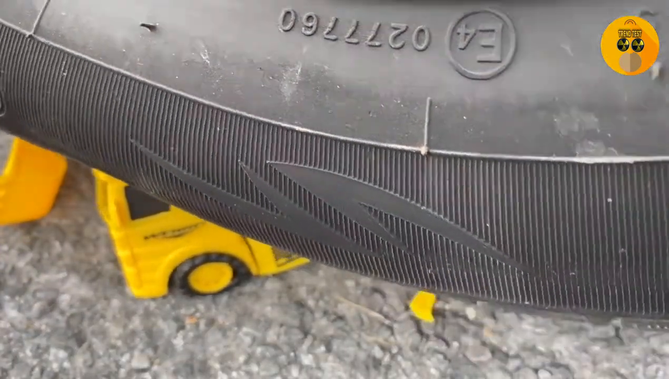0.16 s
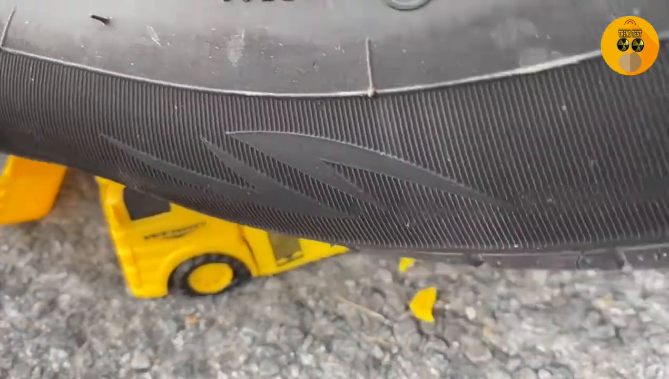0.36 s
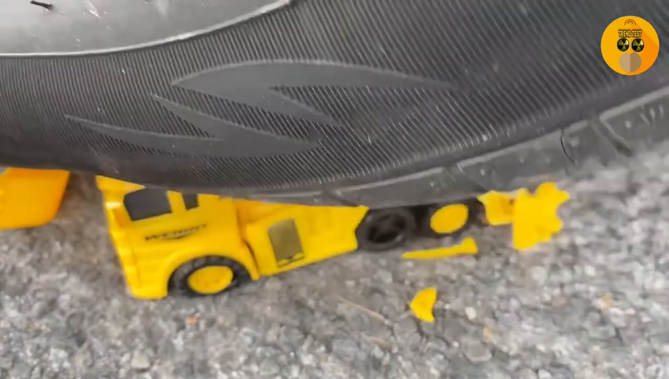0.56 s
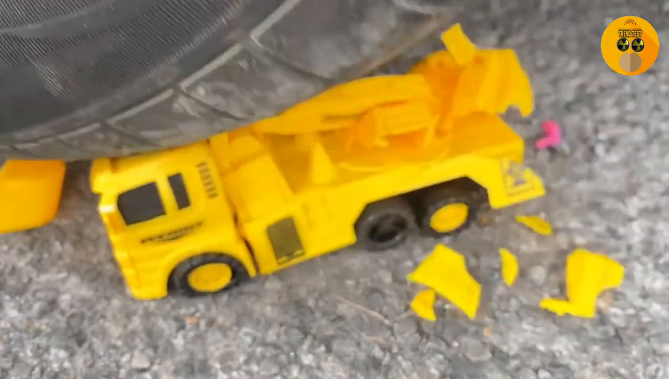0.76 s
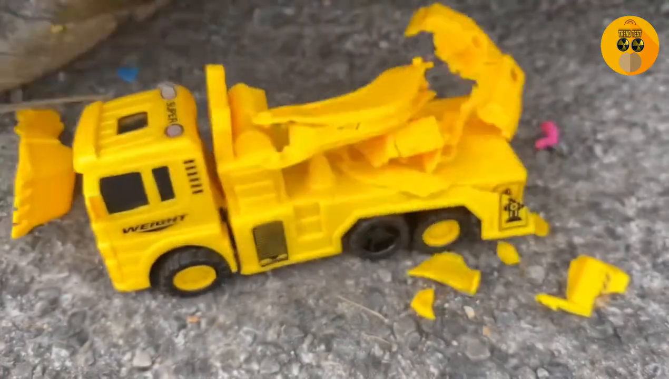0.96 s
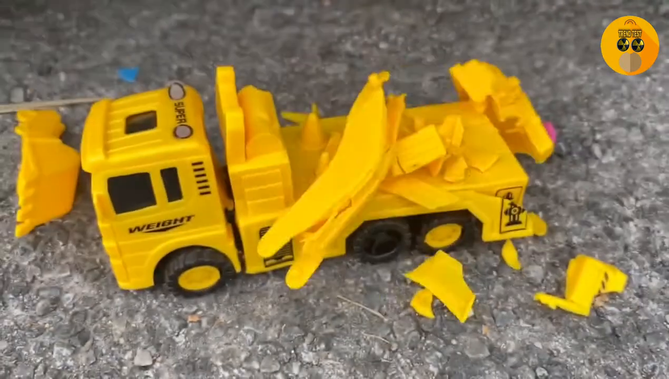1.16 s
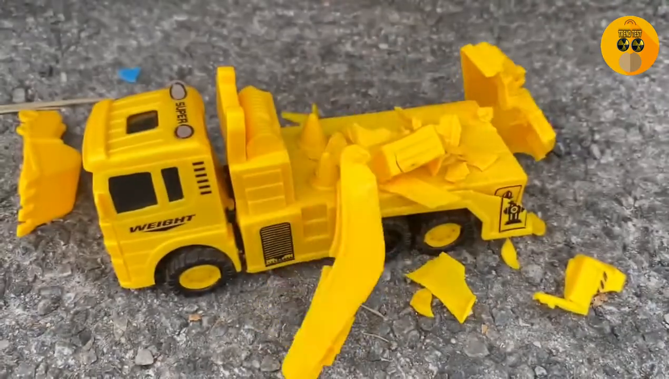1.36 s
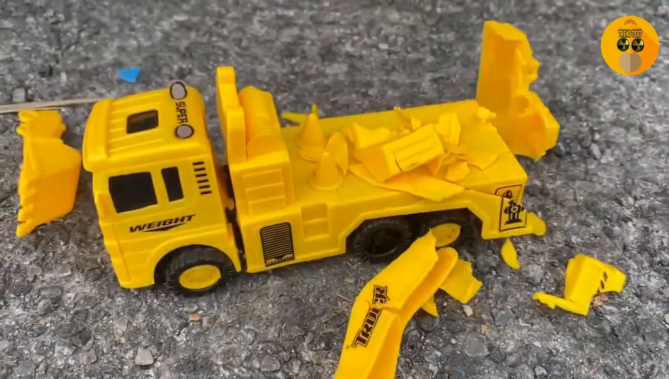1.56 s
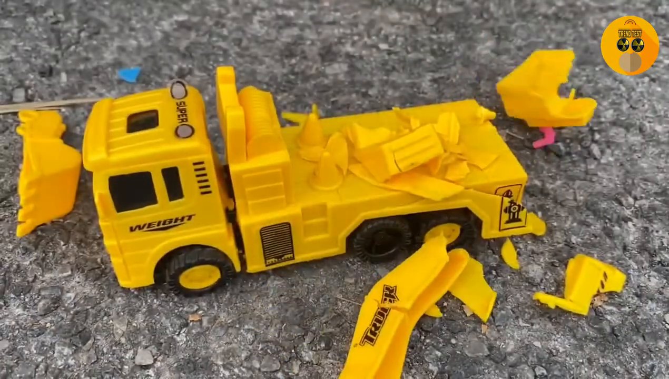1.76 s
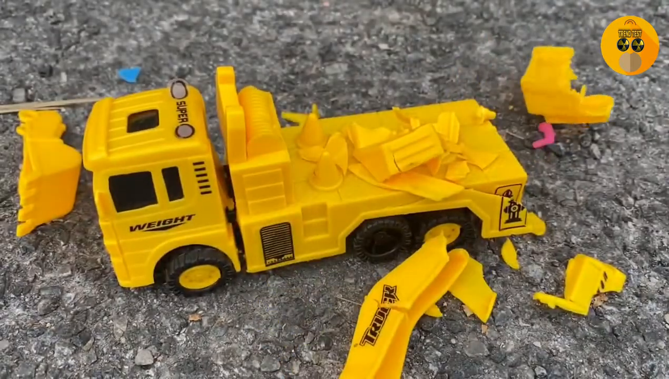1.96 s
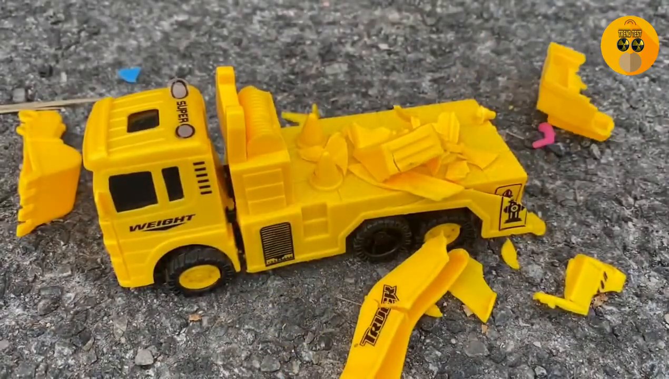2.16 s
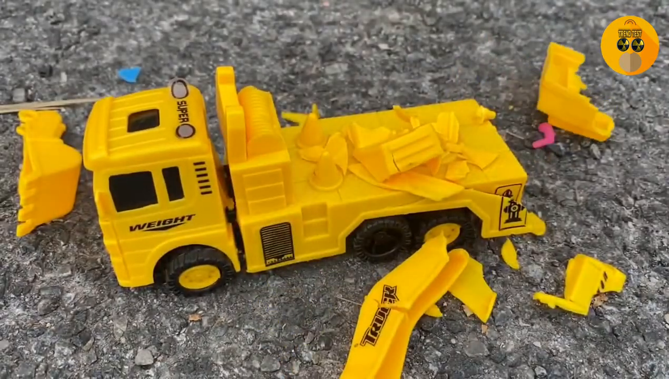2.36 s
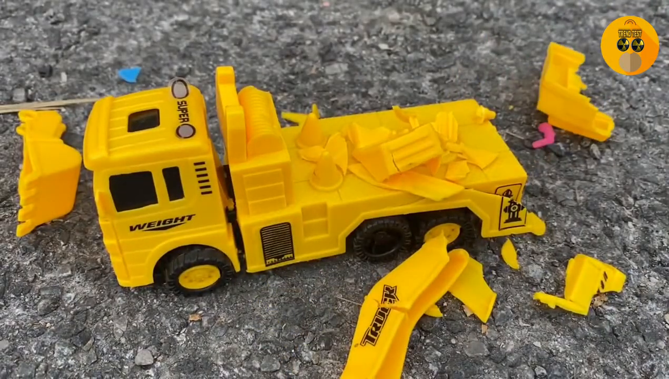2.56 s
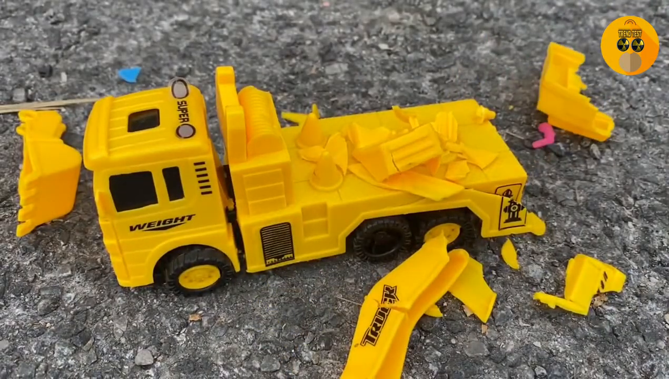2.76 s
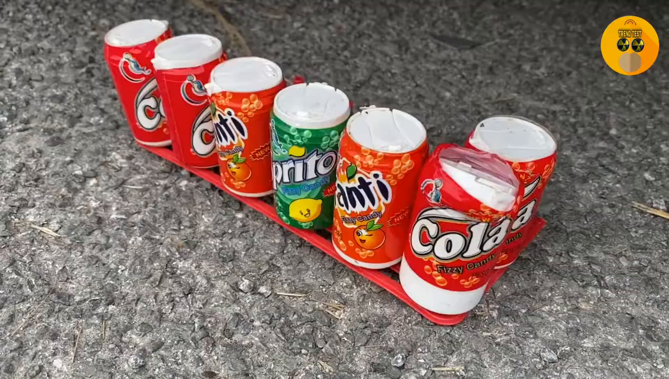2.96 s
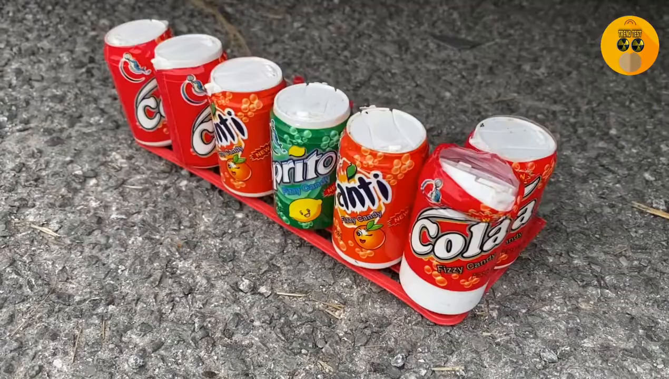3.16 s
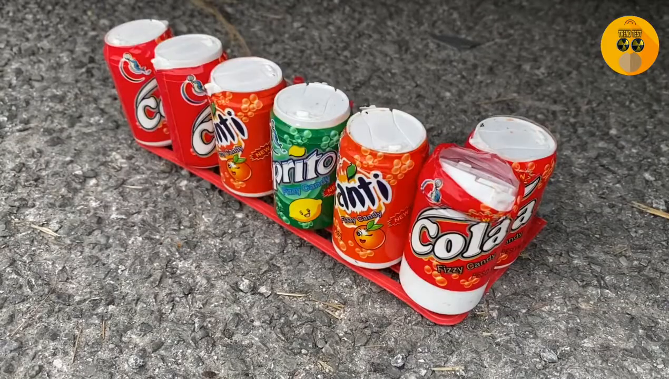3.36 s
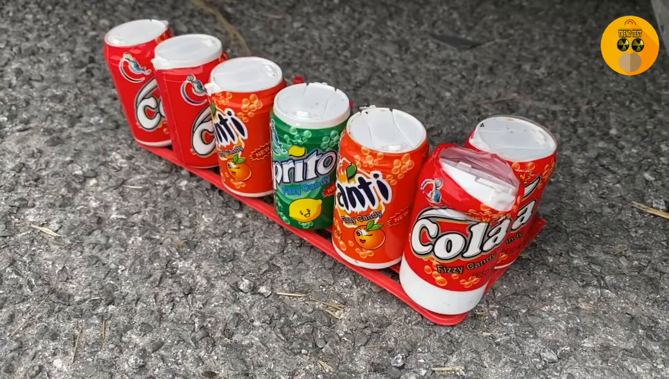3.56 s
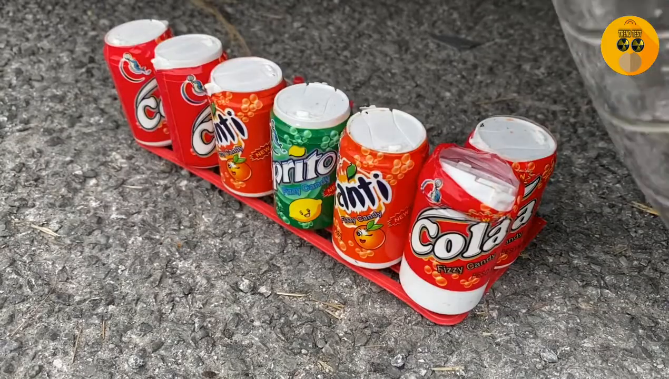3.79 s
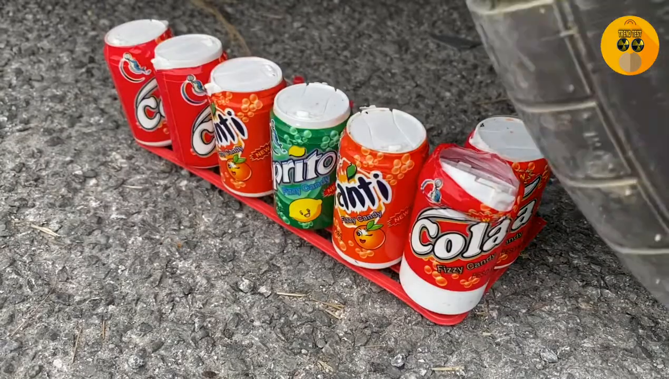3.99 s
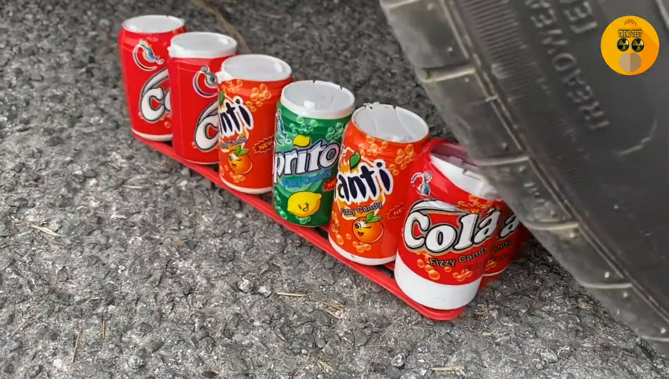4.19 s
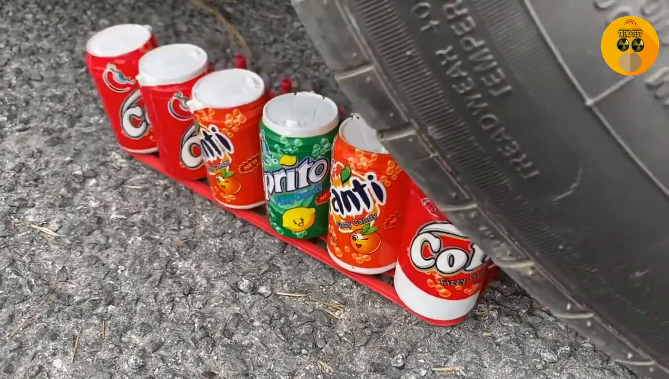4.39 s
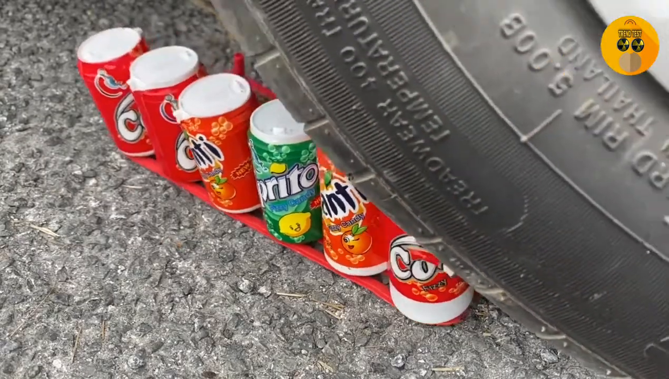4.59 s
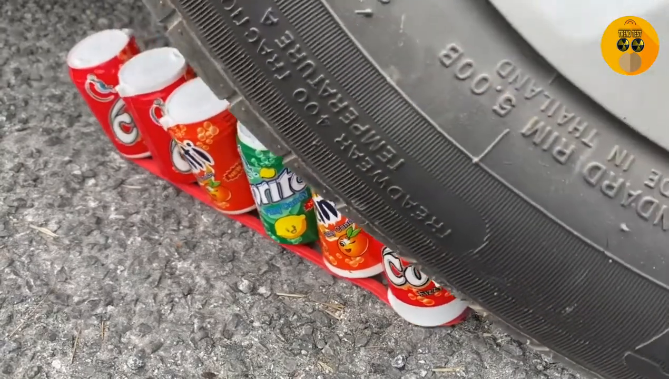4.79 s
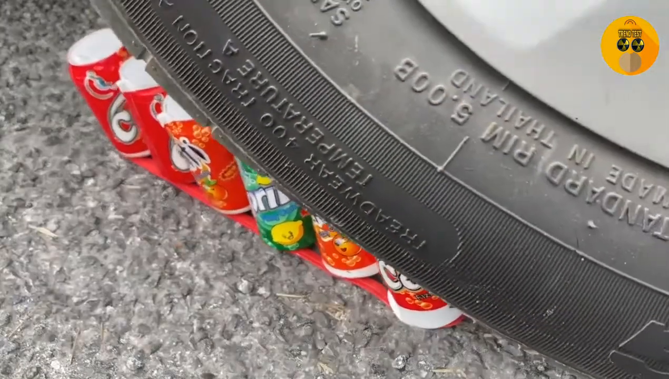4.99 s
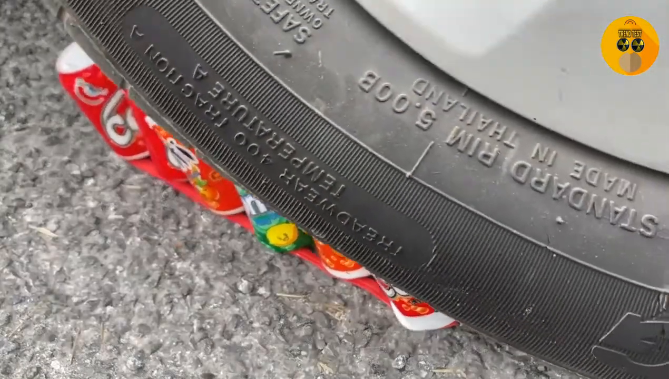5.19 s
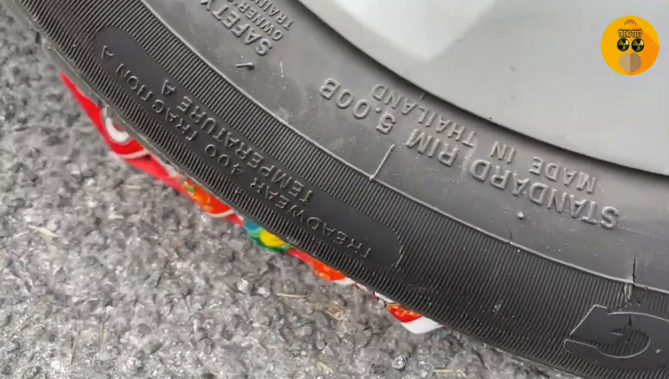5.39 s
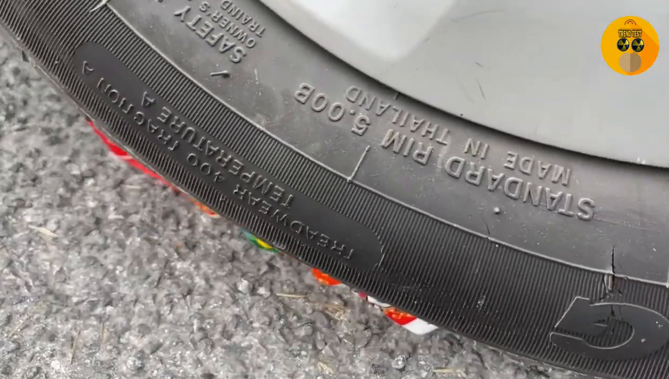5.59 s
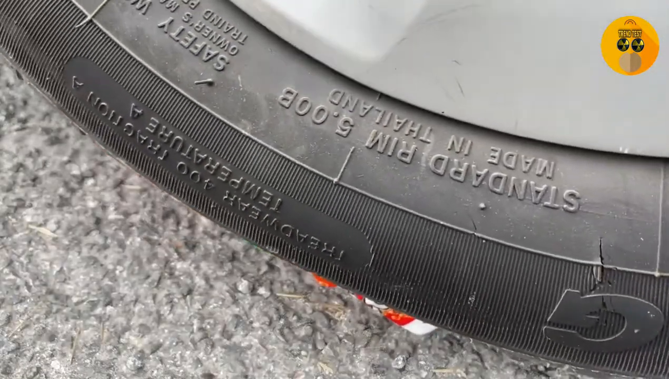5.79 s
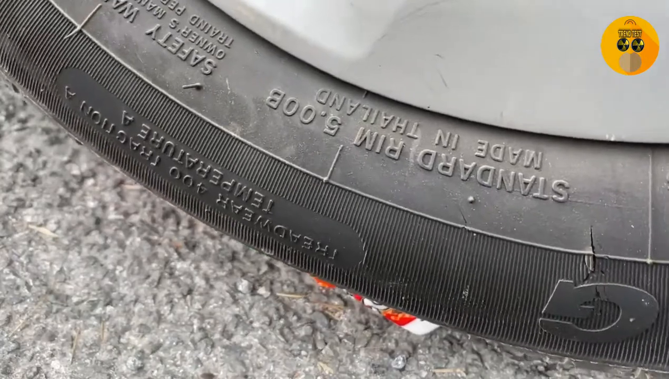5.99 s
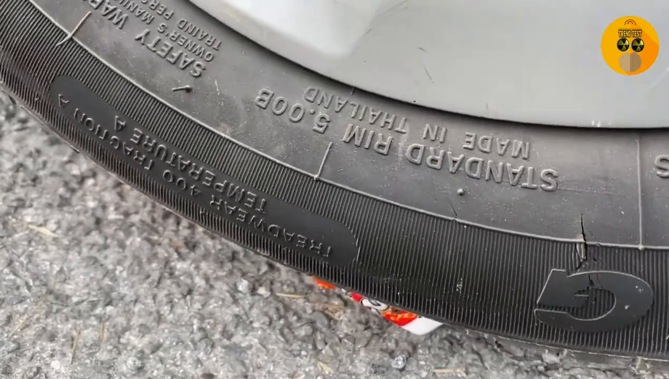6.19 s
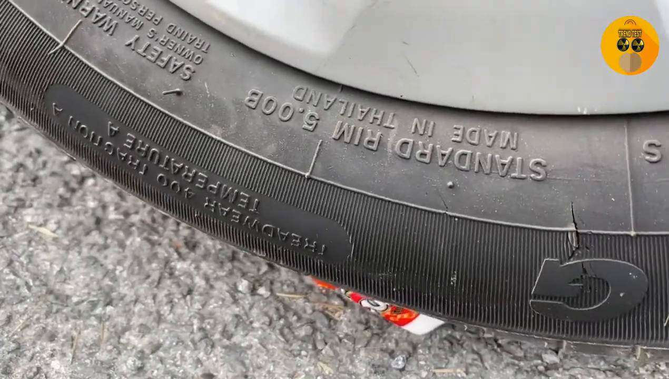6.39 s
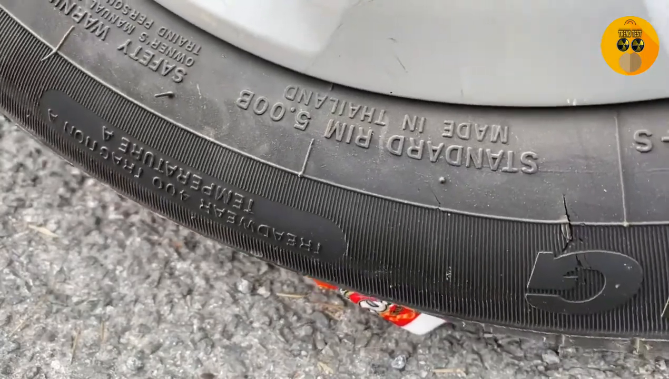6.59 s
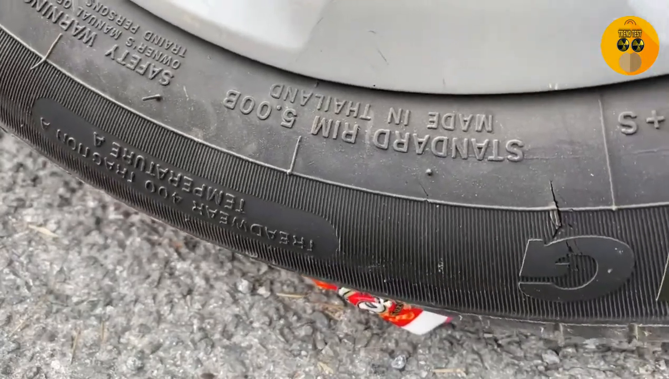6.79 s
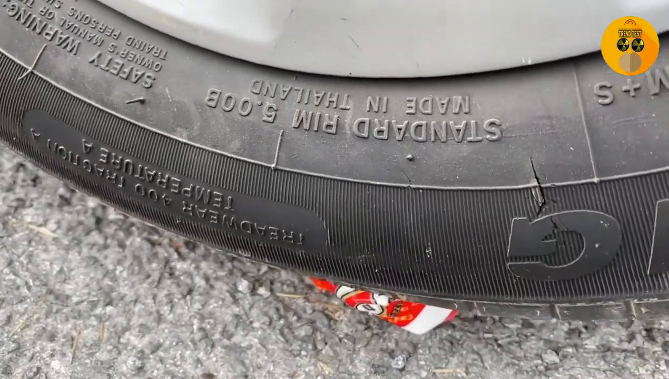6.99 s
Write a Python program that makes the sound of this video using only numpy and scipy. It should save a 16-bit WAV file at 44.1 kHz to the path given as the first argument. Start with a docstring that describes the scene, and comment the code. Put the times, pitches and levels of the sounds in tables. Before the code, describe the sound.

A car tyre creeps over hollow plastic toys on asphalt, snapping a truck, then crunching small cans with sharp cracks and deep thumps beside an idling engine.

```python
"""On asphalt, close to the microphone, a car creeps over hollow plastic toys, in two scenes.
First a toy truck snaps and its pieces skitter away; after an abrupt change of scene the engine throbs nearer
and the tyre crunches through a row of small cans, which split one by one and thump against the rubber.
Plastic is shaped noise and short panel rings, thumps are sinking sines, the engine is harmonics
and fluttering noise; random echo patterns add the wheel arch."""
import sys
import numpy as np
from scipy import signal
from scipy.fft import rfft, irfft, next_fast_len
from scipy.io import wavfile

SR = 44100
rng = np.random.default_rng(int(sys.argv[2]) if len(sys.argv) > 2 else 0)


def digitize_waveform(pressure):
    """Quantize a signal to 16-bit integers and store it at the path in sys.argv[1].

    Rows of a 2-D input are taken as channels; values are limited to [-1, 1].
    """
    field = np.atleast_2d(pressure).T
    bounded = np.clip(field, -1, 1)
    quanta = np.round(bounded * 32767).astype(np.int16)
    wavfile.write(sys.argv[1], SR, quanta)


N = 310905
TIME = np.arange(N) / SR
CANS_START_S = 2.99  # the truck scene gives way to the can scene

# Fractures: (time [s], length [s], strength [dB], body [dB], edge [dB], shell note [Hz], left-right bias [dB])
# body: how much of the big panels moves with it; edge: how keenly the crack tip snaps
FRACTURES = [(0.1139, .0035, -19.5, -1.5, 3, 3565, -5), (0.1828, 0.0012, -36, -3, 3, 4530, 3),
             (.1900, 0.0035, -23.5, 0.5, 2.5, 4920, -12), (0.2122, 0.0055, -38.5, 4, 8, 1250, 9),
             (0.2953, 0.0032, -24.5, 11.5, -3.5, 1090, 16), (0.3339, 0.0043, -30.5, 9.5, 0.5, 740, 9),
             (0.5438, 0.0035, -45, 10.5, -14, 650, 4), (0.5676, 0.0015, -38, -6.5, -12, 560, 6),
             (.615, 0.0028, -34, -17, 12.5, 4600, -1), (0.628, 0.0016, -25, -19, 1.5, 4300, -7),
             (0.6855, 0.0013, -26.5, 0, -6.5, 1960, 9), (4.2127, 0.0043, -47.5, 7, 17, 3240, 2),
             (4.2273, 0.0031, -48, 20, 18, 1580, -7), (4.313, 0.0077, -45.5, 22.5, -12, 2020, 10),
             (4.361, 0.0055, -32, -1, 12, 2910, 19), (4.3714, .0017, -23.5, -16, 10, 5600, 5),
             (4.403, 0.012, -36, 13.5, 21.5, 5150, 10), (4.4203, 0.00017, -32.5, 1, 18.5, 4730, -13),
             (4.4543, 0.0036, -22, 5.5, -6.5, 868, -3), (4.4595, 0.0055, -33, -7, 18.5, 5230, 18),
             (4.4893, 0.011, -25, -7, 2, 1200, 3), (4.4999, 0.007, -17, -2.5, -5, 546, 6),
             (4.5055, 0.0057, -30, -15, -2, 2650, 8), (4.5235, 0.0033, -28.5, -9, 11, 2720, 7),
             (4.53, 0.0075, -31, -11, -11, 2800, 9), (4.555, 0.0017, -23.5, -8, -2, 1170, -4),
             (4.618, 0.0044, -28, 2, 3, 1440, -1), (4.6455, 0.00047, -18, -9, -0.5, 690, -9),
             (4.7324, 0.0022, -19.5, -3, 3, 605, 9), (4.761, .0023, -32, -13, -1, 1330, 12),
             (4.8525, 0.00067, -27, -0.5, 4.5, 507, 6), (5.1328, .0035, -17.5, -1, 0, 5420, 8),
             (5.1954, 0.007, -29, 10, 2.5, 1270, -4), (5.2193, 0.00033, -16, -19, 2, 5220, 15),
             (5.2252, 0.0047, -20.5, 5.5, -17, 3100, 8), (5.516, 0.0022, -26, 5, -1, 897, 1),
             (5.5885, 0.002, -32.5, -0.5, 2, 1230, 4), (5.6035, 0.001, -29.5, -5.5, -11, 700, 5),
             (5.626, 0.0022, -29, 0.5, -8, 1270, 5), (5.7279, 0.003, -22.5, 0, 3, 1280, 6),
             (5.789, 0.0029, -12, -5.5, -4.5, 730, 23), (6.1085, 0.00063, -30, -1.5, 9, 1260, 11),
             (6.1383, 0.004, -18, -7.5, -2, 3680, -6), (6.2919, 0.0018, -25, -15, 6, 660, -11),
             (6.419, 0.0032, -21, 3, 1, 1170, 5.5), (6.8064, 0.0028, -30, -2.5, -1.5, 1690, 8)]
# Bands of each crack: the microphone delays the bass; each band has its own length:
# (lower edge [Hz], upper edge [Hz], delay [s], factor on length [1], share of body [1], share of edge [1])
FRACTURE_BANDS = [(201, 387, .0016, 0.9, 1, 0.027), (492, 1130, 0.00065, 1.83, 0.65, 0.05),
                  (1056, 2480, 0.00017, 1.7, 0.17, 0), (2750, 4780, 0.00007, 1.16, 0.04, 0.3),
                  (5450, 9600, 0.000036, 1.28, 0.031, 0.92)]
# Colour of the shards: (frequency [Hz], level [dB])
SHARD_COLOUR = [(100, 1.5), (3200, -1.5), (4100, -2), (5000, -1), (6300, -6), (7600, 3.5), (9000, 0.5),
                (10000, -4)]


def gain_of(db):
    """Level law: decibels to an amplitude ratio."""
    return 10 ** (np.asarray(db) / 20)


def evened(x):
    """Equal power: each channel is scaled to rms 1."""
    return x / np.sqrt(np.mean(x ** 2, -1, keepdims=True) + 1e-20)


def read(points, hz):
    """Spectral interpolation: straight lines on a log-frequency axis."""
    f, value = np.transpose(points)
    return np.interp(np.log(hz + 1), np.log(f + 1), value)


def curves(rows):
    """Linear interpolation in time: the columns of a control table at every sample."""
    s, *columns = np.transpose(rows)
    return [np.interp(TIME, s, column) for column in columns]


def coloured(x, points):
    """Linear filtering: the spectrum is multiplied by a (frequency [Hz], level [dB]) curve."""
    size = next_fast_len(N + 4096)
    gain = gain_of(read(points, np.fft.rfftfreq(size, 1 / SR)))
    return irfft(rfft(x, size) * gain, size)[..., :N]


def band(x, lo_hz, hi_hz, order=3):
    """Causal band-pass: frequencies outside the two edges are attenuated."""
    edges_hz = [lo_hz, min(hi_hz, SR / 2 - 100)]
    return signal.sosfilt(signal.butter(order, edges_hz, "band", fs=SR, output="sos"), x)


def add(mix, s, sound):
    """Superposition: a sound is mixed in at time s."""
    part = mix[..., max(round(s * SR), 0):][..., :sound.shape[-1]]
    part += sound[..., :part.shape[-1]]


def wander(per_s):
    """Random modulation: a curve of about unit size that takes per_s new values a second."""
    knots = np.arange(4096) / per_s
    return np.interp(TIME, knots, rng.standard_normal(len(knots)))


def engine(rush_db=3.5, throb_db=0.73, waver=0.35, flutter_db=1.04, surge_db=2.0, whine_drift=1.0,
           tappet_db=-14, tappet_phase=0.55, tappet_width=0.028):
    """Periodic excitation: low orders align once a cycle into a throb; fan rush flutters and a tappet ticks."""
    # Engine beside the truck, then beside the cans: (time [s], hum [dB], rush of fan and belts [dB])
    far = [(0, -54, -50.5), (.6, -53, -52), (.8, -67, -49), (2.95, -58.5, -56.5)]
    near = [(3.0, -40.5, -38), (4.5, -37.5, -40), (4.95, -54, -52.5), (5.95, -49, -53), (6.35, -52.5, -47),
            (7.05, -50.5, -50.5)]
    # Harmonics of the engine cycle: (multiple of the cycle [1], level [dB])
    harmonics = [(3, -7), (4, -16), (5, -20.5), (6, 0.5), (7, -12), (8, -7.5), (9, -12.5), (13, -16),
                 (14, -10.5)]
    # Spectrum of the rush: (frequency [Hz], level [dB per Hz])
    rush_colour = [(15, -3), (45, 16), (130, 6.5), (260, 5.5), (400, 1), (700, 0), (1200, -0.5),
                   (2000, -11.5), (3000, -13), (4500, -13.5), (6400, -22.5), (7600, -13.5), (9000, -14),
                   (10000, -25.5)]
    # Fan and belt tones against the rush curve: (frequency [Hz], level by the truck [dB], by the cans [dB])
    tones = [(140, -8, -15), (402, -10, -30), (484, -18, -29.5), (577, -18, -16.5), (617, -10.5, -8)]
    cycle_hz, strong_firing_s = 10.78, 3.067

    cut = [(CANS_START_S, *far[-1][1:]), (CANS_START_S + 1 / SR, *near[0][1:])]
    hum_db, rush_curve_db = curves(list(far) + cut + list(near[1:]))
    cycle = (TIME - strong_firing_s) * cycle_hz

    hum = np.zeros(N)
    for multiple, db in harmonics:
        size = gain_of(db) * (1 + waver * wander(3.4)) * np.sqrt(2)
        hum -= size * np.cos(2 * np.pi * multiple * cycle + waver * wander(15))

    air = evened(coloured(rng.standard_normal((2, N)), rush_colour))
    body_filter = signal.butter(2, [180, 1500], "band", fs=SR, output="sos")
    body = signal.sosfiltfilt(body_filter, air)
    air = air - body + body * gain_of(surge_db * wander(35))  # the body is lumpier than the hiss
    air = air * gain_of(throb_db * np.cos(2 * np.pi * cycle) + flutter_db * wander(130))

    whine = np.zeros(N)
    for hz, far_db, near_db in tones:
        size = gain_of(np.where(TIME < CANS_START_S, far_db, near_db)) * np.sqrt(2)
        whine += size * np.sin(2 * np.pi * hz * TIME + whine_drift * wander(14))

    tick_noise = evened(band(rng.standard_normal((2, N)), 3000, 9500, order=1))
    tappet = tick_noise * np.exp(-((cycle - tappet_phase) % 1) / tappet_width)
    tonal = gain_of(hum_db) * hum + gain_of(rush_curve_db) * whine
    return tonal, gain_of(rush_curve_db + rush_db) * (air + gain_of(tappet_db) * tappet)


def grains(per_s, size_db, decay, count=12):
    """Shot noise: random micro-fractures of uneven size, each ringing one of a few scraps of plastic."""
    t, out = np.arange(400) / SR, np.zeros((2, N))
    scraps = evened(rng.standard_normal((count, 2, len(t))) * np.exp(-t / decay))
    chance, which = rng.random(N), rng.integers(0, count, N)
    size = np.minimum(rng.exponential(1, N), 3)
    for i in np.flatnonzero(chance < per_s / SR):
        add(out, i / SR, gain_of(size_db * size[i]) * scraps[which[i]])
    return out


def hollow(x):
    """Resonance: the modes of the hollow shells are added to the sound."""
    # Shell resonances: (frequency [Hz], width [Hz], lift [dB])
    resonances = [(474, 10, -16.5), (850, 62, 5.5), (1270, 97, 8), (1870, 300, 4), (2600, 140, 1),
                  (3070, 84, 3.5), (5100, 63, -6), (7200, 46, 3.5), (7570, 110, 2.5)]
    return x + sum(gain_of(db) * signal.lfilter(*signal.iirpeak(hz, hz / width, fs=SR), x)
                   for hz, width, db in resonances)


def folding(swell_db_per_s=336, fade_db_per_s=430):
    """Buckling: each wall swells into its fold and dies away; the loudest at any moment sets the level."""
    # Folds of the can walls: (time of the height [s], level [dB])
    buckles = [(4.24, -36), (4.34, -30), (4.471, -16.5), (4.529, -17), (4.648, -22.5), (4.758, -22.5)]
    return np.max([db - np.maximum(swell_db_per_s * (s - TIME), fade_db_per_s * (TIME - s))
                   for s, db in buckles], axis=0)


def crunch(crackle_db=1, calm_per_s=260, crowding=0.07):
    """Crackling noise: strain sets level and rate of fine fractures; sliding and folding add a coarser crunch."""
    # Strain on the truck, then on the cans: (time [s], crackle level [dB])
    truck_strain = [(0, -92), (.15, -48.5), (.75, -70), (1.05, -61.5), (1.3, -65), (1.6, -61), (2.1, -68)]
    can_strain = [(4.15, -53), (4.29, -48.5), (4.51, -31.5), (4.62, -30.5), (4.92, -47), (5.47, -52.5),
                  (5.66, -40.5), (5.82, -59), (6.25, -52.5), (6.65, -54)]
    # Truck pieces slide and settle on the road: (time [s], level [dB])
    slides = [(.5, -74), (.72, -59), (1.25, -49.5), (1.55, -59.5), (2.3, -58), (2.6, -59.5)]
    # Spectra of the fine crackle and of the walls: (frequency [Hz], level [dB per Hz])
    fine_colour = [(200, -29), (1000, 0.5), (2300, -1), (3300, -0.5), (4200, -4.5), (5200, -2), (6400, -6),
                   (7600, 1), (9300, -1), (10500, -12.5)]
    wall_colour = [(60, -6.5), (180, -6), (300, 5), (500, 0.5), (900, -11), (1500, -13.5), (2700, -11),
                   (4000, -9), (9000, -13)]

    strain_db, = curves(list(truck_strain) + [(4.1, -78)] + list(can_strain))
    load_db = np.where(TIME < CANS_START_S, curves(slides)[0], folding())
    # more strain, more fractures at once
    per_s = calm_per_s + crowding * SR * gain_of(strain_db - strain_db.max())
    fine = grains(per_s, size_db=13.0, decay=0.0013) / np.sqrt(per_s)
    fine = evened(hollow(coloured(fine, fine_colour)))
    coarse = grains(per_s=1300, size_db=6.0, decay=0.0021)
    coarse = evened(hollow(coloured(coarse, wall_colour)))
    return gain_of(strain_db + crackle_db) * fine + gain_of(load_db) * coarse


def crack_levels():
    """Spectral balance: fracture strength in each band, with body lifting the bass and edge the treble."""
    _, _, strength, body, edge, _, _ = np.transpose(FRACTURES)
    return np.array([strength + body_share * body + edge_share * edge
                     for *_, body_share, edge_share in FRACTURE_BANDS])


def cracks(rise=0.000065, truck_ring_db=-26, can_ring_db=-16, ring_time=0.0059, pan_share=0.25, uneven_db=5):
    """Brittle fracture: tiny ruptures run through the shell in milliseconds; the shards ring very briefly."""
    s, length, *_, pan_db = np.transpose(FRACTURES)
    t = np.arange(2048) / SR
    ruptures = rng.standard_normal((len(s), 2, len(t)))
    # a few ruptures are much larger than the rest
    ruptures = ruptures * gain_of(uneven_db * rng.standard_normal((len(s), 1, len(t))))
    sounds = np.zeros_like(ruptures)
    # thin cans ring on, the thick truck snaps dry
    ring_db = np.where(s < CANS_START_S, truck_ring_db, can_ring_db)[:, None, None]
    for (lo_hz, hi_hz, delay, stretch, *_), db in zip(FRACTURE_BANDS, crack_levels()):
        age = np.maximum(t - delay, 0)
        running = np.exp(-(age / (stretch * length[:, None, None])) ** 2)
        ringing = gain_of(ring_db) * np.exp(-age / ring_time)
        shape = (1 - np.exp(-age / rise)) * (running + ringing)
        # only bands below 3 kHz lean to a side
        sides = evened(gain_of(np.outer(pan_db, [.5, -.5]) * pan_share * (hi_hz < 3000)))
        sounds += evened(band(ruptures * shape, lo_hz, hi_hz)) * (gain_of(db)[:, None] * sides)[..., None]
    out = np.zeros((2, N))
    five_ms = np.sqrt(.005 * SR / len(t))  # as much energy as 5 ms at the given level
    for start, sound in zip(s, sounds):
        add(out, start, sound * five_ms)
    return coloured(out, SHARD_COLOUR)


def panel(t, hz, rise, decay):
    """Modal vibration: a plastic panel rings for a few cycles in its lowest modes."""
    # Modes of a panel: (multiple of its note [1], level [dB])
    partials = [(1, 1.5), (1.469, -11.5)]
    modes = sum(gain_of(db) * np.sin(2 * np.pi * hz * multiple * t) for multiple, db in partials)
    return (1 - np.exp(-t / rise)) * np.exp(-t / decay) * modes


def shell_notes(decay=0.0011, rise=0.003, level_db=-4):
    """Driven resonance: a broken panel rings at its own note, following the crack's level there."""
    # How readily a panel rings at each note: strongest near 550 and 2700 Hz, weakest at 5200 Hz:
    # (frequency [Hz], level [dB])
    readiness = [(550, 10.5), (1300, 6.5), (2700, 11.5), (5200, -6.5)]
    t, out = np.arange(2048) / SR, np.zeros((2, N))
    five_ms = np.sqrt(.005 * SR / len(t))  # as much energy as 5 ms at the given level
    centres = [np.sqrt(lo_hz * hi_hz) for lo_hz, hi_hz, *_ in FRACTURE_BANDS]
    for (s, *_, hz, pan_db), levels in zip(FRACTURES, crack_levels().T):
        db = read(list(zip(centres, levels)), hz) + read(readiness, hz)
        note = panel(t, hz, rise, decay)
        sides = evened(gain_of(np.array([.5, -.5]) * pan_db * (hz < 3000)))
        add(out, s, gain_of(db + level_db) * five_ms * np.outer(sides, evened(note)))
    return out


def swings(deep_drop_hz=111, shallow_db_per_octave=-9):
    """Damped rebound: every drop with its rebound and wobble, as rows like the drops."""
    # A shell gives way and the tyre drops: (time [s], level [dB], settling pitch [Hz], decay time [s])
    drops = [(0.119, -19, 96, 0.0055), (4.457, -4, 88.6, 0.019), (4.563, -17, 120, 0.014),
             (4.525, -15, 58.6, 0.032), (4.593, -17, 53.7, 0.029), (4.736, -11.5, 73.4, 0.0062),
             (5.2292, -4.5, 218, .0065), (5.533, -27, 51.7, .033), (5.591, -29, 58.4, 0.068),
             (5.732, -11.5, 101, .0099), (5.7917, -11, 134, 0.011), (6.423, -26.5, 62.4, 0.044)]
    # The tyre rebounds, then wobbles: (delay [s], level against the drop [dB], pitch [Hz], decay time [s])
    rebounds = [(.008, -4, 45.2, 0.02), (0.054, -19, 59.5, 0.078)]
    rows = list(drops)
    for s, db, hz, _ in drops:
        # drops that sound higher than deep_drop_hz are shallow and swing less
        depth_db = db + shallow_db_per_octave * max(np.log2(hz / deep_drop_hz), 0)
        rows += [(s + delay, depth_db + swing_db, swing_hz, decay)
                 for delay, swing_db, swing_hz, decay in rebounds]
    return rows


def thumps(glide=1.38, glide_share=0.298, rise=0.00037, tyre_hz=258, tyre_t60=0.92):
    """Damped oscillation: the tyre drops with a low push that sinks in pitch; the air inside it hums on."""
    # The ring of air inside the tyre is struck: (time [s], peak level [dB])
    air_knocks = [(0.298, -39), (5.232, -35), (5.797, -46)]
    t, out = np.arange(SR * 3 // 4) / SR, np.zeros(N)
    for s, db, hz, decay in swings():
        pitch = hz * (1 + glide * np.exp(-t / (glide_share * decay)))
        turns = np.cumsum(pitch) / SR
        envelope = (1 - np.exp(-t / rise)) * np.exp(-t / decay)
        add(out, s, gain_of(db) * envelope * np.sin(2 * np.pi * turns))
    for s, db in air_knocks:
        add(out, s, gain_of(db - 60 * t / tyre_t60) * np.sin(2 * np.pi * tyre_hz * t))
    return out


def splinters(largest_hz=1800, smallest_hz=9800, uneven_db=3):
    """Random scatter: faint splinters at random moments, thinning out in level, as (s, dB, Hz) rows."""
    # Flights from the truck, then the cans: (from [s], to [s], rate [1/s], level [dB], fade [dB/s])
    flights = [(0.749, 2.05, 12, -26.5, 17), (4.195, 7.05, 9.9, -27, 2.5)]
    rows = []
    for start, end, per_s, db, fade in flights:
        when, size, pitch = rng.random((80, 3)).T
        age = (np.arange(len(when)) + when) / per_s
        hz = largest_hz * (smallest_hz / largest_hz) ** pitch
        level = db - fade * age + uneven_db * (2 * size - 1)
        rows += list(np.transpose([start + age, level, hz])[age < end - start])
    return rows


def ticks(decay=0.0026, spread=1.245, level_db=3):
    """Impulsive impact: each splinter gives one short, bright click of decaying noise."""
    # The clearest small snaps and landing splinters: (time [s], relative level [dB], centre [Hz])
    clear_snaps = [(.232, -30, 2030), (.5815, -24.5, 4400), (.7398, -25.5, 2060), (.791, -27.5, 4680),
                   (.932, -25.5, 1750), (1.0002, -18.5, 4930), (1.1482, -29, 1940), (1.0188, -16.5, 4300),
                   (1.192, -23, 4400), (1.2352, -26.5, 6300), (1.325, -33, 3280), (1.4087, -26, 3580),
                   (1.4576, -28, 2720), (1.717, -28, 5800), (1.8387, -28.5, 6700), (1.9435, -35.5, 3170),
                   (4.27, -23, 7110), (4.3355, -15.5, 2040), (4.3938, -8, 6900), (4.5868, -11.5, 7300),
                   (4.814, -20.5, 2000), (4.9425, -25.5, 7300), (4.9782, -21.5, 2230), (5.0886, -25, 1980),
                   (5.2684, -17, 1970), (5.29, -19.5, 4600), (5.4712, -24.5, 7500), (5.7147, -18.5, 1510),
                   (6.016, -23.5, 1600), (6.0559, -22, 1850), (6.178, -17.5, 5500), (6.5465, -22.5, 3430)]
    t, out = np.arange(700) / SR, np.zeros((2, N))
    for s, db, hz in list(clear_snaps) + splinters():
        burst = rng.standard_normal((2, len(t))) * np.exp(-t / decay)
        click = band(burst, hz / spread, hz * spread, order=1)
        add(out, s, gain_of(db + level_db) * evened(click) / 10)
    return coloured(out, SHARD_COLOUR)


def tumbles(decay=0.006, rise=0.00083, level_db=-2):
    """Impact excitation: a hollow piece lands with a soft, dull knock."""
    # Large truck pieces tumble onto the road: (time [s], relative level [dB], pitch [Hz])
    landings = [(0.773, -39, 630), (1.008, -35, 826), (1.072, -34, 890), (1.222, -37, 339),
                (1.477, -44, 338), (1.635, -42, 409), (2.139, -43, 420)]
    t, out = np.arange(2048) / SR, np.zeros((2, N))
    for s, db, hz in landings:
        add(out, s, gain_of(db + level_db) * panel(t, hz, rise, decay))
    return out


def grit(start_db=-45, until_s=4.4, fade_db_per_s=29):
    """Granular friction: loose grit grinds under the approaching tread while it rolls on bare road."""
    level_db = start_db - fade_db_per_s * np.maximum(TIME - until_s, 0)
    stones = grains(per_s=400, size_db=2.0, decay=0.0047, count=24)
    stones = evened(band(stones, 520, 1780, order=2))  # the band in which the stones grate
    return (TIME > CANS_START_S) * gain_of(level_db) * stones


def dents(start_s=4.4, end_s=6.2, per_s=11, faintest_db=-35, range_db=10, lo_hz=1660, hi_hz=3300,
          decay=0.00092, spread=1.3, count=40):
    """Snap-through buckling: a patch of thin, flattened wall flips inwards with a faint, dry pop."""
    t, out = np.arange(700) / SR, np.zeros((2, N))
    for k, (when, size, pitch) in enumerate(rng.random((count, 3))):
        s = start_s + (k + when) / per_s
        hz = lo_hz * (hi_hz / lo_hz) ** pitch
        burst = rng.standard_normal((2, len(t))) * np.exp(-t / decay)
        pop = band(burst, hz / spread, hz * spread, order=2)
        add(out, s, (s < end_s) * gain_of(faintest_db + range_db * size) * pop / abs(pop).max())
    return out


def wheel_arch(x, gap=0.0044, early_db=7, early_time=0.0038):
    """Reverberation: dense early echoes between tyre, road and arch, then a short tail from under the car."""
    # Reverberation of wheel arch and underbody: (frequency [Hz], t60 [s])
    arch_t60 = [(100, 0.056), (500, 0.17), (1500, 0.17), (3000, 0.14), (6000, 0.1), (10000, 0.089)]
    t = np.arange(SR // 3) / SR
    taps = rng.choice([-1., 1.], (2, len(t))) * (rng.random((2, len(t))) < 3000 / SR) * (t > gap)
    taps = taps * gain_of(early_db * np.exp(-t / early_time))
    hz, age, z = signal.stft(taps, SR, nperseg=256)
    decay = gain_of(-60 * age / read(arch_t60, hz)[:, None])
    tail = signal.istft(z * decay, SR, nperseg=256)[1]
    return signal.oaconvolve(x, tail / np.linalg.norm(tail, axis=1, keepdims=True), axes=1)[:, :N]


def moving_arch(x, count=3, turn_hz=1.1):
    """Time-varying reflection: the wheel rolls on, so a few echo patterns fade into one another."""
    phase = turn_hz * TIME + np.arange(count)[:, None] / count
    shares = np.maximum(np.cos(2 * np.pi * phase), 0)
    shares = shares / np.linalg.norm(shares, axis=0)
    return sum(wheel_arch(x * share) for share in shares)


def ports(x):
    """Partial coherence: two microphone ports share bass and treble; treble is half a millisecond late at left."""
    # Likeness of the two ports: (frequency [Hz], left-right coherence [1])
    coherence = [(60, 0.99), (200, 0.44), (500, 0.73), (1100, 0.13), (2200, 0.7), (2900, 0.057),
                 (4000, 0.79), (5600, 0.87), (8000, .97)]
    # Balance of the ports: (frequency [Hz], left-right level [dB])
    balance = [(100, 0.5), (260, 2), (600, -0.5), (1400, 2.5), (2700, 4.5), (4000, 0.5), (9000, 0)]
    # Phase by which the left port lags: (frequency [Hz], lag [rad])
    lag = [(0, 0), (800, .4), (1450, 5.4), (2500, 6.4), (3400, 12.9), (5900, 21.8), (10000, 34.8)]
    size = next_fast_len(N + 4096)
    hz = np.fft.rfftfreq(size, 1 / SR)
    own, right = rfft(x, size)
    same = np.clip(read(coherence, hz), 0, 1)
    left = same * right + np.sqrt(1 - same ** 2) * own
    left = left * np.exp(-1j * np.interp(hz, *np.transpose(lag)))
    lean = gain_of(read(balance, hz) / 2)
    return irfft(np.array([left * lean, right / lean]), size)[:, :N]


def from_left(x, lead_s, lean=1):
    """Time and level difference: low sound reaches the left earlier and, where lean is set, at another level."""
    # Level difference of the bass, as the tyre stands to the left: (frequency [Hz], left-right level [dB])
    bass_balance = [(50, 4), (120, -1.5), (240, 3)]
    size = next_fast_len(N + 4096)
    hz, z = np.fft.rfftfreq(size, 1 / SR), rfft(x, size)
    half = gain_of(lean * read(bass_balance, hz) / 2) * np.exp(1j * np.pi * hz * lead_s)
    return irfft(np.array([z * half, z / half]), size)[:, :N]


def scene(truck_echo_db=-12, truck_dull_db=-6, cans_echo_db=-10.5, thump_echo_db=-13):
    """Superposition of sources and echoes; the truck lies in the open, so its echoes are fainter and duller."""
    hum, rush = engine()
    plastic = crunch() + cracks() + shell_notes() + ticks() + tumbles() + dents()
    pushes = thumps()
    from_truck = gain_of(truck_echo_db) * coloured(plastic, [(1000, 0), (3000, truck_dull_db)])
    from_cans = gain_of(cans_echo_db) * plastic
    echoes = moving_arch(np.where(TIME < CANS_START_S, from_truck, from_cans))
    boom = gain_of(thump_echo_db) * wheel_arch(np.array([pushes, pushes]))
    bass = from_left(hum, lead_s=0.00043, lean=0) + from_left(pushes, lead_s=0.00081)
    return ports(plastic + echoes + rush + grit()) + bass + boom


def record(dry, mic_top_hz=9750, ceiling=0.84, edge_hz=10820):
    """Band limiting and saturation: the microphone's treble ends, peaks are rounded, then the band limit."""
    heard = signal.oaconvolve(dry, signal.firwin(121, mic_top_hz, fs=SR)[None], "same")
    rounded = heard / (1 + (heard / ceiling) ** 4) ** (1 / 4)
    limit = signal.firwin(101, edge_hz, window=("kaiser", 7), fs=SR)
    return signal.oaconvolve(rounded, limit[None], "same")


dry = scene()
out = record(dry)
digitize_waveform(out)
```